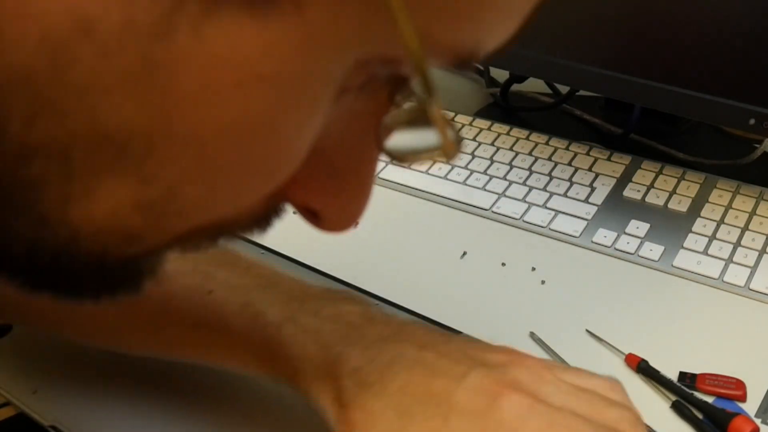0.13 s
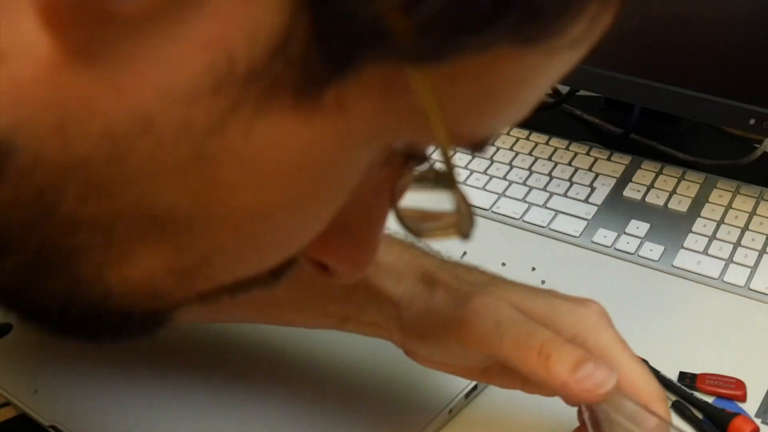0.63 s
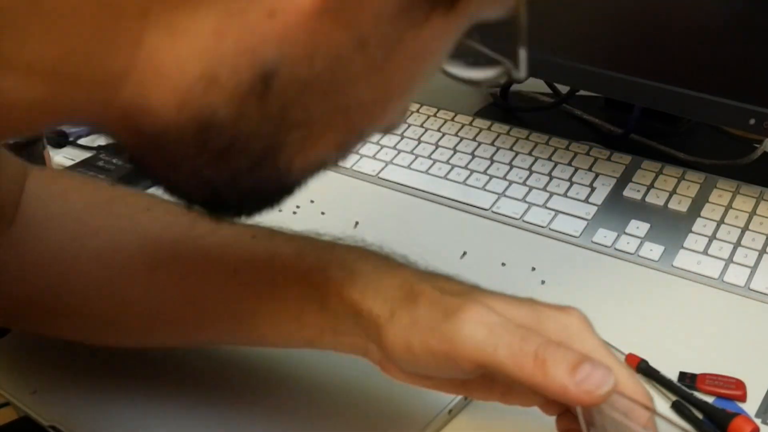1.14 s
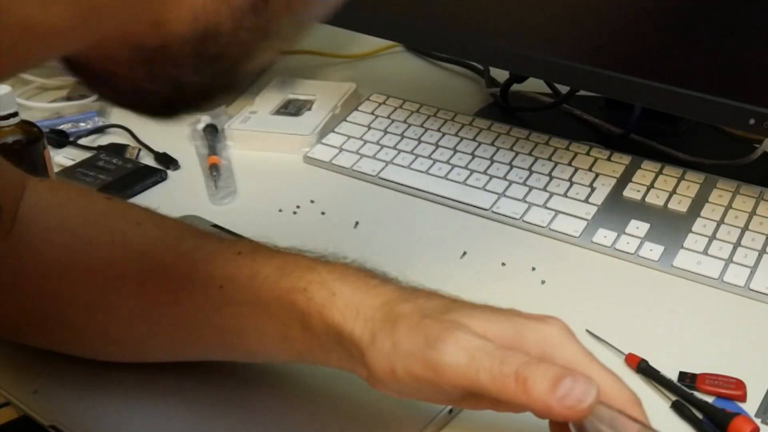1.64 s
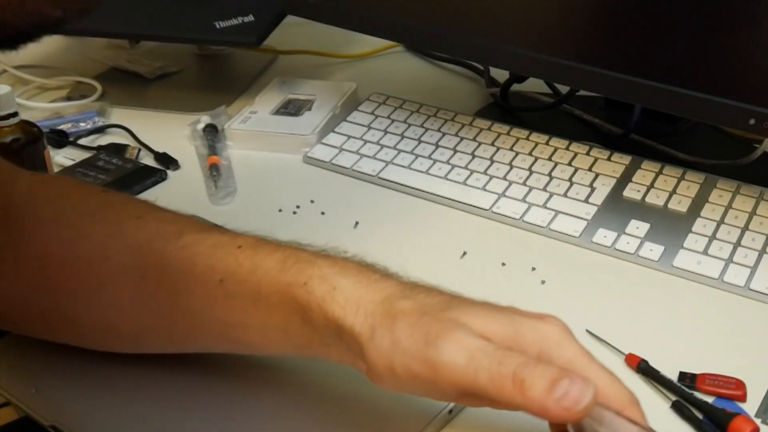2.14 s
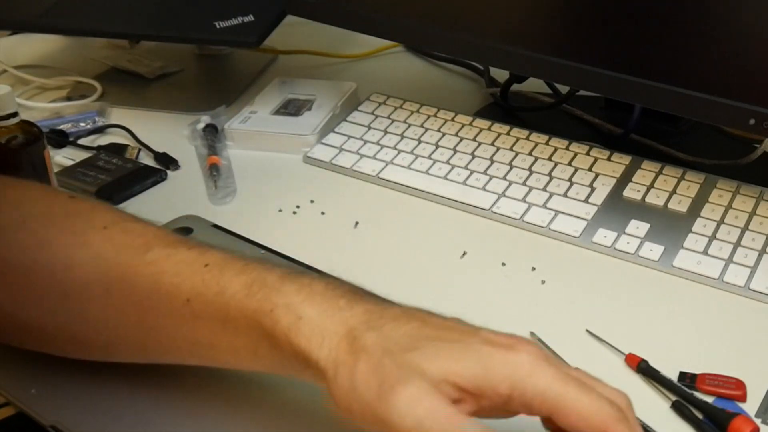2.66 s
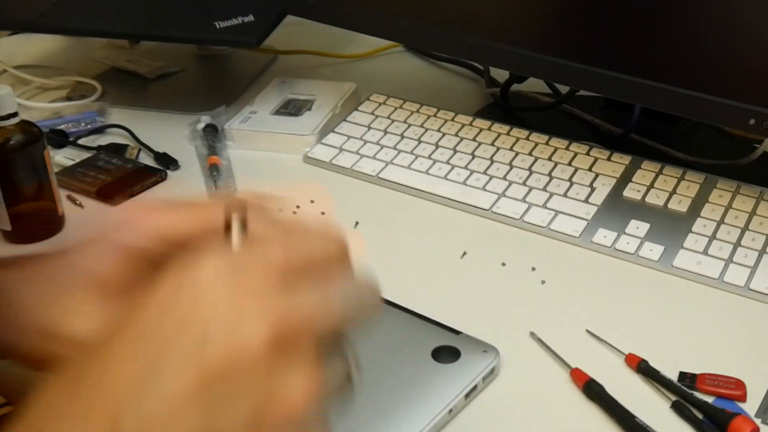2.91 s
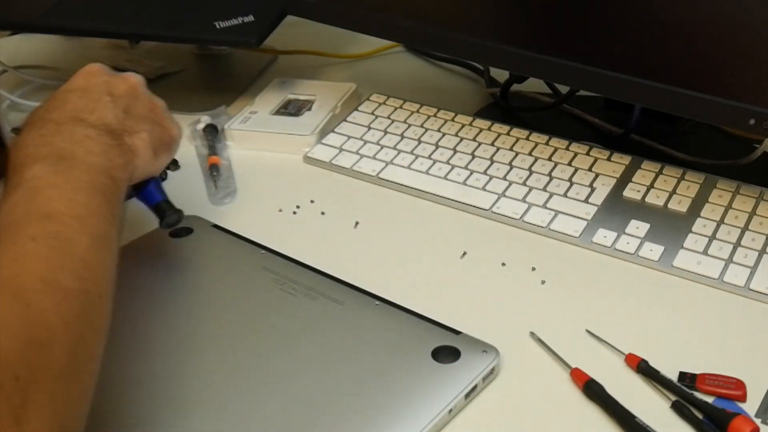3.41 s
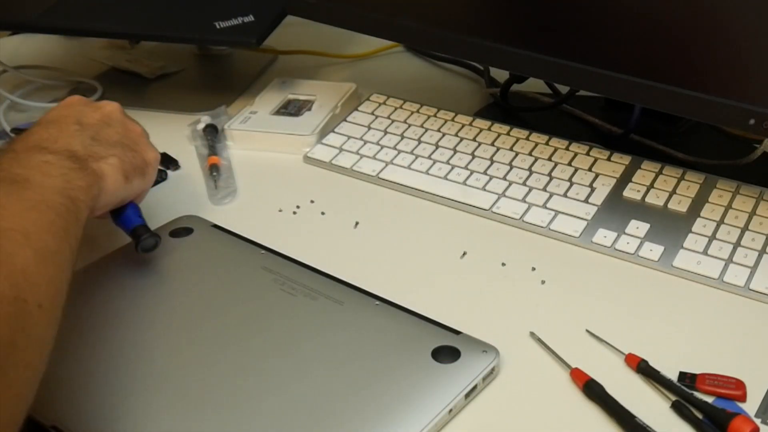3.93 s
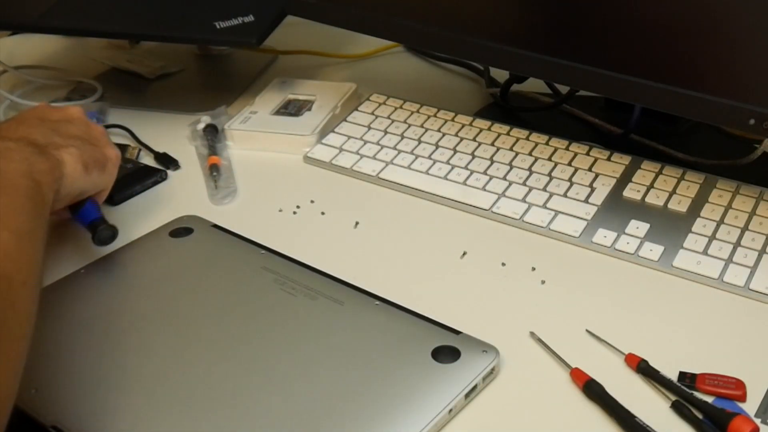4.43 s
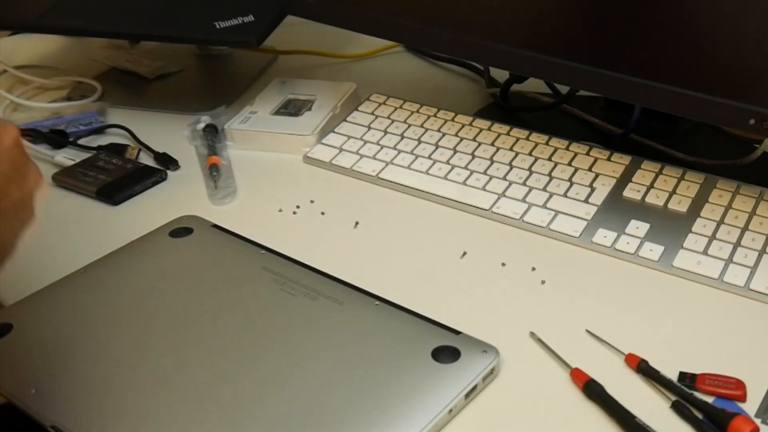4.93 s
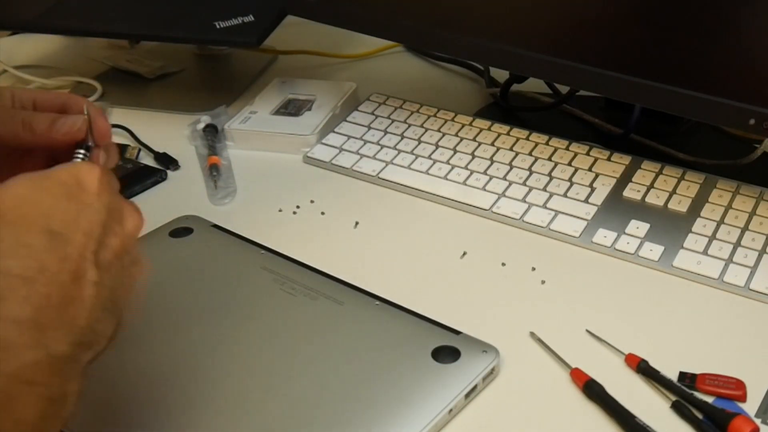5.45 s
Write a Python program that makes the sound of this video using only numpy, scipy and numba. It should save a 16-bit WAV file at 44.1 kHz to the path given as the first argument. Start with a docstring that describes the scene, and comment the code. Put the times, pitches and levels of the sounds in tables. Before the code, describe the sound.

Close, nearly mono sound of laptop repair at a desk: sparse clicks and hollow taps over low fan-like air noise, then a sudden cluster of scrapes, bright metal clacks and a heavy thud around three seconds. A near-silent pause follows, then another double knock, and finally tiny crackles and ticks of small metal parts. Background noise swells briefly after loud hits.

```python
"""Over a steady bed of room tone, a laptop is put back together on a desk in a small quiet room.
Scattered finger and tool taps ring the metal case; from 2.4 s it is dragged and knocked, then bumped hardest
near 3.3 s. After a lull come more knocks at 4.3 s, then a faint slide, bright ticks and rustling parts.
Noise bursts and tiny impacts drive resonances; a noise gate lets the room tone swell after each loud sound."""
import sys
import numpy as np
from scipy import signal
from scipy.fft import rfft, irfft
from scipy.io import wavfile
from scipy.ndimage import uniform_filter1d
from numba import njit

SR = 44100
rng = np.random.default_rng(int(sys.argv[2]) if len(sys.argv) > 2 else 0)


def put_to_file(sound):
    """Save the sound as 16-bit audio at rate SR, in the file named by the first command-line argument."""
    columns = np.atleast_2d(sound).T  # one column per channel
    safe = np.clip(columns, -1, 1)
    whole_steps = np.round(safe * 32767)
    wavfile.write(sys.argv[1], SR, whole_steps.astype(np.int16))


def voltage_ratio(decibels):
    """Convert decibels (scalar or array-like) to amplitude ratios, 20 dB per decade."""
    exponent = np.asarray(decibels, float) / 20
    return 10 ** exponent


N = 245637  # length in samples
# All source levels below are set ahead of the gate.


def unit(x):
    """Scales a sound to rms 1."""
    return x / np.sqrt(np.mean(x ** 2))


def band(x, hz, width_hz):
    """Two-pole band-pass: a single resonance with gain 1 near its centre."""
    g = np.tan(np.pi * min(width_hz, 0.4 * SR) / SR)
    return signal.lfilter([g, 0, -g], [1 + g, -2 * np.cos(2 * np.pi * hz / SR), 1 - g], x)


def steep(x, hz, width_hz):
    """The band-pass applied twice, for steeper skirts."""
    return band(band(x, hz, width_hz), hz, width_hz)


def ring_width_hz(t60_s):
    """Bandwidth of a resonance that dies away by 60 dB in t60_s."""
    return np.log(1000) / np.pi / t60_s


def peaks(x, table):
    """Sum of parallel resonances, alternating in sign."""
    out = 0
    for k, (hz, width_hz, level_db) in enumerate(table):
        out = out + (-1) ** k * voltage_ratio(level_db) * band(x, hz, width_hz)
    return out


def grit(rate_hz, spread_db):
    """Dense tiny impacts of random sign, a few much larger than the rest."""
    chance, sign, size = rng.random((3, N))
    hits = chance < rate_hz / SR
    return hits * np.sign(sign - 0.5) * voltage_ratio(-spread_db * np.log(size))


def contacts(rows, attack_s, fade_s, linger):
    """Each contact builds up, holds and lets go, longer ones more slowly; one envelope per level column."""
    t = np.arange(N) / SR
    power = 0
    for start_s, hold_s, *level_db in rows:
        rise = np.clip((t - start_s) / attack_s, 0, 1)
        fall = np.exp(-np.maximum(t - start_s - hold_s, 0) / (fade_s + linger * hold_s))
        power = power + np.outer(voltage_ratio(level_db), rise * fall) ** 2
    return np.sqrt(power)


def add(out, start_s, sound, peak_db):
    """Mixes a short sound in at its peak level."""
    i = int(start_s * SR)
    scaled = sound * voltage_ratio(peak_db) / np.abs(sound).max()
    out[i:i + len(sound)] += scaled[:N - i]


# spectrum of the air noise: pitch_hz [Hz], relative level_db [dB]
AIR_SPECTRUM = [(15, -40.5), (25, -44), (48, -3), (134, -9.5), (157, -1.5), (270, -1), (301, -6.5),
                (489, -6.5), (575, -10), (1260, -10.5), (1370, -10.5), (1480, -16), (3340, -27.5),
                (9570, -21), (16000, -25)]
# mains hum: pitch_hz [Hz], rms level_db [dB]
MAINS_HUM = [(60, -103), (120, -80)]


def room_tone():
    """Distant fans and the microphone's own hiss are shaped noise; mains hum is a pair of sines."""
    pitch_hz, level_db = np.transpose(AIR_SPECTRUM)
    f = np.maximum(np.arange(N // 2 + 1) * SR / N, 1)
    shape = voltage_ratio(np.interp(np.log(f), np.log(pitch_hz), level_db))
    air = irfft(rfft(rng.standard_normal(N)) * shape, N)
    t = np.arange(N) / SR
    hum = sum(np.sqrt(2) * voltage_ratio(db) * np.sin(2 * np.pi * hz * t) for hz, db in MAINS_HUM)
    return unit(air) * voltage_ratio(-66) + hum


# how long the room rings: pitch_hz [Hz], t60_s [s]
ROOM_DECAY = [(150, 0.29), (600, 0.62), (2500, 0.91), (7000, 1), (14000, 0.45)]


def room(x, build_s=0.0027):
    """Diffuse tail of a small furnished room: each half octave's energy builds up, then dies away as noise."""
    pitch_hz, t60_s = np.transpose(ROOM_DECAY)
    out = np.zeros(N)
    for hz in 100 * 2 ** np.arange(0, 7.4, 0.5):
        band_t60_s = np.interp(np.log(hz), np.log(pitch_hz), t60_s)
        keep = 1000 ** (-2 / band_t60_s / SR)  # share of the energy left after one sample
        rise = np.exp(-1 / build_s / SR)
        poles = np.convolve([1, -keep], [1, -rise])
        energy = signal.lfilter([(1 - keep) * (1 - rise)], poles, steep(x, hz, hz / 2) ** 2)
        noise = unit(steep(rng.standard_normal(N), hz, hz / 2))
        out += np.sqrt(np.abs(energy)) * noise
    return out


# the two lowest modes of the desk top: pitch_hz [Hz], width_hz [Hz], relative level_db [dB]
DESK_MODES = [(54, 10, -7.5), (118, 16, 11)]
# arms leaning and shifting on the desk top: start_s [s], hold_s [s], level_db [dB]
ARM_CONTACTS = [(2.42, 0.42, -77), (2.89, 0.077, -54.5), (3.0, 0.4, -67), (3.34, 0.066, -57.5),
                (3.6, 0.074, -68), (3.76, 0.016, -64), (3.9, .15, -83), (4.17, 0.22, -69),
                (4.45, 0.034, -57), (4.52, 0.074, -61), (4.8, 0.067, -63.5), (4.98, 0.02, -65),
                (5.09, 0.021, -64), (5.15, 0.5, -83)]


def lean():
    """Soft arm contacts make the desk top hum in its two lowest modes."""
    push = band(rng.standard_normal(N), 60, 100)
    hum = unit(peaks(push, DESK_MODES))
    return hum * contacts(ARM_CONTACTS, attack_s=0.038, fade_s=0.02, linger=0.1)[0]


# fingers rustling over small parts: start_s [s], hold_s [s], level_db [dB]
RUSTLES = [(4.867, 0.0089, -71), (4.926, 0.0093, -64), (4.978, 0.014, -67), (5.004, 0.0076, -62.5),
           (5.175, 0.01, -56.5), (5.215, .006, -68), (5.39, 0.067, -66.5), (5.49, 0.063, -66)]


def rustle():
    """Skin on small metal parts gives a fine crackle of treble impacts."""
    crackle = unit(steep(grit(8300, 2.9), 12000, 9000))
    return crackle * contacts(RUSTLES, attack_s=0.0047, fade_s=0.0071, linger=0.12)[0]


# scraping resonances of the case edge: pitch_hz [Hz], width_hz [Hz], relative level_db [dB]
EDGE_SCRAPE = [(1870, 540, 11.5), (2350, 290, 11.5), (2798, 560, 9)]
# its brighter, hissing resonances: pitch_hz [Hz], width_hz [Hz], relative level_db [dB]
EDGE_SHEEN = [(3820, 900, 8), (5560, 1800, 14.5), (6480, 1900, 19), (8120, 3930, 12.5), (11100, 2500, -4.5),
              (13500, 3000, -7)]
# metal ticking on metal: start_s [s], peak_db [dB], pitch_hz [Hz]
METAL_TICKS = [(0.179, -57.5, 4030), (0.207, -56, 5630), (0.227, -38.5, 3200), (0.226, -41, 6460),
               (0.264, -50, 3810), (0.281, -56, 4090), (0.308, -54, 4030), (0.377, -56, 4640),
               (0.769, -63.5, 4200), (1.066, -48.5, 4700), (1.1, -57, 4400), (1.183, -53.5, 5000),
               (1.251, -57, 5000), (1.535, -44, 5940), (1.534, -44, 4520), (1.63, -59.5, 6300),
               (1.715, -60, 5210), (1.851, -56, 5200), (2.228, -52, 3530), (2.427, -44, 3030),
               (2.436, -41, 5500), (2.436, -44, 8850), (2.447, -47, 7000), (2.538, -46, 6950),
               (2.581, -56.5, 7710), (2.694, -48.5, 5800), (2.694, -45.5, 8700), (2.878, -26, 8090),
               (2.937, -25, 6260), (2.937, -28.5, 12500), (3.372, -41, 8200), (4.256, -45.5, 5600),
               (4.32, -37, 4160), (4.378, -49, 4300), (5.184, -50.5, 7920), (5.187, -43, 5270),
               (5.218, -62, 7500), (5.375, -44.5, 4520), (5.536, -45, 5870)]


def ticks():
    """About a millisecond of rough contact excites the bright resonances of the case edge."""
    out, t = np.zeros(N), np.arange(2000) / SR
    for start_s, peak_db, pitch_hz in METAL_TICKS:
        contact = rng.standard_normal(len(t)) * t * np.exp(-t / 0.0009)
        edge = peaks(contact, EDGE_SCRAPE + EDGE_SHEEN)
        add(out, start_s, steep(edge, pitch_hz, 0.41 * pitch_hz), peak_db)
    return out


# what the case and desk ring with: pitch_hz [Hz], relative level_db [dB], t60_s [s]
CASE_MODES = [(189.5, 2, 0.15), (279, 5, 0.23), (400.2, 4, 0.16), (465.4, 6.5, 0.069), (540, -4, 0.17),
              (615, 11, 0.25), (690, 0, 0.43), (735, 10.5, 0.096), (848.7, 10, 0.15), (939, 8.5, 0.35),
              (1084, 2.5, 0.31), (1204, 5.5, 0.16), (1296, 5.5, 0.52), (1352, 8, 0.11), (1455, 6.5, 0.18),
              (1720, 4, 0.064), (2018, -27.5, .06), (2340, -0.5, 0.047), (2740, 3, 0.14)]


def case(force):
    """Every mode of the case rings on after a push."""
    return peaks(force, [(hz, ring_width_hz(t60_s), db) for hz, db, t60_s in CASE_MODES])


# the case dragged, bumped or set down:
# start_s [s], hold_s [s], relative rumble_db [dB], panels_db [dB over the rumble]
CASE_SHAKES = [(0.224, 0.0092, -49, 13), (0.257, 0.016, -48.5, 6), (1.06, 0.024, -56, 1),
               (2.393, 0.041, -64.5, 18.5), (2.425, 0.0087, -41.5, 12.5), (2.446, 0.044, -71, 18),
               (2.516, .18, -58.5, 1), (2.685, 0.031, -54.5, 7), (2.748, 0.063, -61.5, 2.5),
               (2.852, 0.057, -40, 0.5), (2.897, 0.062, -40.5, 3), (2.98, 0.026, -47, 3),
               (3.015, 0.067, -61.5, 9.5), (3.33, .052, -25.5, -5.5), (3.408, 0.066, -41.5, -10),
               (4.249, 0.013, -50, -11), (4.278, 0.13, -59, -2), (4.444, 0.04, -31.5, -3),
               (4.461, 0.031, -30.5, -8), (4.483, 0.068, -39, -0.5), (4.551, 0.039, -40.5, -4),
               (4.582, 0.1, -48.5, -9.5), (4.72, 1, -62, -2)]
# its edge rubbing on the desk: start_s [s], hold_s [s], scrape_db [dB], hiss_db [dB]
EDGE_RUBS = [(.229, 0.0024, -42, -56), (.25, .04, -63, -68.5), (1.06, 0.016, -68, -70),
             (1.537, 0.0015, -56, -73), (2.398, 0.037, -53, -60), (2.44, 0.039, -61.5, -76),
             (2.5, 0.21, -73, -74), (2.69, .015, -59.5, -67), (2.72, 0.13, -77.5, -76),
             (2.856, 0.037, -49.5, -46), (2.877, 0.059, -45.5, -45.5), (2.945, 0.03, -53.5, -53.5),
             (2.97, 0.069, -58, -60), (3.333, 0.06, -55, -59.5), (3.362, 0.0098, -51.5, -59.5),
             (4.255, .012, -61, -61.5), (4.318, 0.026, -53.5, -60.5), (4.35, 0.087, -63, -70),
             (4.452, 0.031, -50, -65), (4.49, 0.041, -58, -77), (4.55, 0.087, -71, -85),
             (4.72, 0.46, -80.5, -75), (5.176, 0.011, -71.5, -63), (5.39, 0.062, -76, -71),
             (5.2, 0.27, -81.5, -74), (5.49, 0.064, -68.5, -66.5)]


def slides():
    """Stick-slip impacts shake the case, which rings on; the rubbing edge scrapes and hisses."""
    low = unit(steep(steep(grit(4000, 1.5), 493, 870), 493, 870))
    upper = unit(steep(steep(grit(4000, 1.5), 1146, 810), 1223, 1300))
    shakes = [(start_s, hold_s, db, db + over_db) for start_s, hold_s, db, over_db in CASE_SHAKES]
    rumble, panels = contacts(shakes, attack_s=0.009, fade_s=0.0029, linger=0.2)
    push = rumble * low + panels * upper
    ringing = case(push) / np.std(case(low))

    rub = grit(12000, 1.7)
    scrape_level, hiss_level = contacts(EDGE_RUBS, attack_s=0.0037, fade_s=0.0043, linger=0.22)
    scrape = scrape_level * unit(band(peaks(rub, EDGE_SCRAPE), 2430, 1700))
    hiss = hiss_level * unit(peaks(rub, EDGE_SHEEN))
    return 0.37 * ringing + 0.41 * push + scrape + hiss


# finger and tool taps on the case: start_s [s], peak_db [dB], pitch_hz of the loudest ring [Hz]
CASE_TAPS = [(0.18, -52, 800), (0.207, -48, 1010), (0.227, -29.5, 1192), (0.233, -38.5, 737),
             (0.264, -39.5, 715), (0.281, -45, 834), (0.289, -52, 890), (0.309, -45, 1420),
             (0.378, -40.5, 1400), (0.769, -54.5, 1140), (0.943, -50.5, 200), (1.066, -38, 1400),
             (1.073, -38.5, 1340), (1.1, -54.5, 404), (1.182, -49.5, 1430), (1.19, -47.5, 1340),
             (1.251, -46.5, 1330), (1.302, -47.5, 1250), (1.313, -52, 1150), (1.255, -51.5, 1150),
             (1.349, -46, 506), (1.35, -47.5, 1200), (1.535, -25, 1217), (1.535, -44, 2550),
             (1.537, -35, 1410), (1.554, -49.5, 1250), (1.565, -47, 1140), (1.619, -61, 853),
             (1.68, -43, 505), (1.683, -44, 1120), (1.716, -40, 1300), (1.72, -57, 2080), (1.85, -50, 1390),
             (1.886, -54, 1350), (2.227, -52.5, 1330), (2.422, -30, 1134), (2.426, -27.5, 914),
             (2.436, -30, 1250), (2.446, -43, 1110), (2.458, -42, 1250), (2.539, -51.5, 1190),
             (2.552, -46, 1643), (2.581, -55, 876), (2.61, -48.5, 850), (2.695, -30, 1280),
             (2.716, -53.5, 1200), (2.792, -49, 930), (2.877, -34.5, 715), (2.92, -31, 724),
             (2.938, -23, 788), (3.346, -23.5, 415), (3.361, -22.5, 607), (3.371, -21.5, 630),
             (3.382, -20, 615), (3.388, -27, 590), (3.63, -51, 393), (4.258, -56, 398),
             (4.322, -39.5, 2060), (4.332, -48, 2300), (4.381, -45.5, 2400), (4.466, -22, 740),
             (4.47, -38, 286), (4.474, -24.5, 710), (4.5, -37.5, 282), (4.486, -27, 735), (4.553, -32, 600),
             (4.975, -60, 2490), (5.032, -58, 2400), (5.374, -58, 340), (5.485, -56.5, 2300)]


def taps(case_db=-12, knock_db=-17, overtone=1.8, bounce_s=0.0023, panel_t60_s=0.02):
    """A soft blow with quick bounces rings the nearest panel, its overtone and the whole case."""
    out, t = np.zeros(N), np.arange(6000) / SR
    for start_s, peak_db, pitch_hz in CASE_TAPS:
        bounces = 0.036 * rng.standard_normal(len(t)) * np.exp(-t / bounce_s)
        force = (t == t[40]) + bounces  # one blow among the bounces
        push = steep(force, pitch_hz, 1.1 * pitch_hz)
        panel = unit(band(push, pitch_hz, ring_width_hz(panel_t60_s)))
        body = voltage_ratio(case_db) * unit(case(push))
        knock = voltage_ratio(knock_db) * unit(steep(force, overtone * pitch_hz, 0.45 * pitch_hz))
        add(out, start_s, panel + body + knock, peak_db)
    return out


def scene():
    """Nearly mono mix: a very faint side signal holds a little of the mid, its upper range and hiss."""
    close = taps() + ticks() + rustle()
    desk = slides() + lean()
    # sounds that shake the whole desk drive the room harder
    tail = room(voltage_ratio(-19.5) * close + voltage_ratio(-15) * desk)
    mid = close + desk + tail + room_tone()
    upper = np.gradient(band(mid, 2700, 2300))
    side_hiss = band(rng.standard_normal(N), 12000, 9000)
    side = -voltage_ratio(-40.5) * mid + voltage_ratio(-21) * upper + voltage_ratio(-85.5) * side_hiss
    return np.array([mid + side, mid - side])


@njit
def follow(x, attack, release):
    """Level follower with separate rates for rising and sinking."""
    level, out = 0., np.empty(len(x))
    for i in range(len(x)):
        rate = attack if abs(x[i]) > level else release
        level += (abs(x[i]) - level) * rate
        out[i] = level
    return out


def gate(dry):
    """Noise gate: gain opens by degrees as the followed level rises above the room tone."""
    shut_db, slope_db_per_db, depth_db = -60, 0.4, 9
    attack_s, release_s = 0.09, 0.17
    smooth = np.sqrt(uniform_filter1d(dry[0] ** 2, size=400) + 1e-14)
    level = follow(smooth, 1 / (attack_s * SR), 1 / (release_s * SR))
    level_db = 20 * np.log10(level + 1e-7)
    gain_db = np.clip(slope_db_per_db * (level_db - shut_db), 0, depth_db)
    return dry * voltage_ratio(gain_db)


def band_limit(x):
    """A steep low-pass at the top of the band."""
    return signal.sosfilt(signal.butter(12, 16500, fs=SR, output="sos"), x)


def record(dry):
    """The gate rides the level, then a steep low-pass cuts the top."""
    low_pass = signal.ellip(8, 0.2, 70, 15800, fs=SR, output="sos")  # edge at 15800 Hz
    mix = signal.sosfilt(low_pass, gate(dry))
    return band_limit(mix)


dry = scene()
out = record(dry)
put_to_file(out)
```